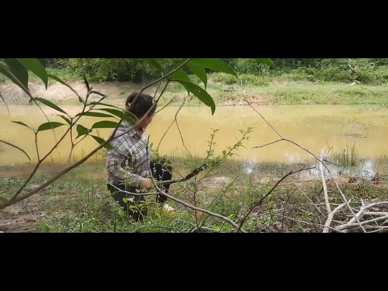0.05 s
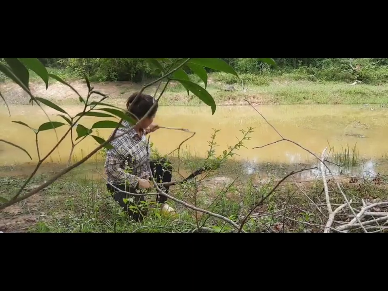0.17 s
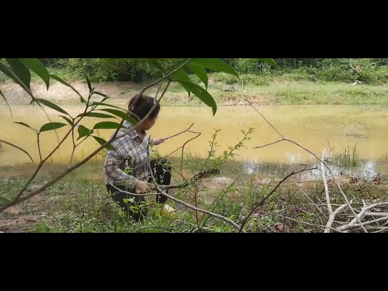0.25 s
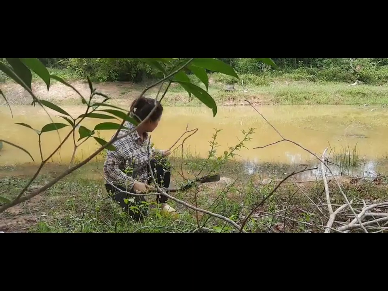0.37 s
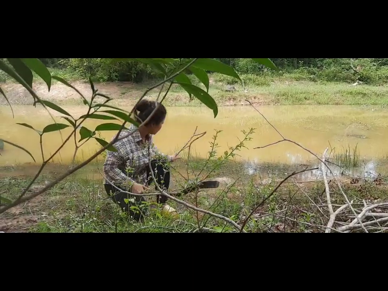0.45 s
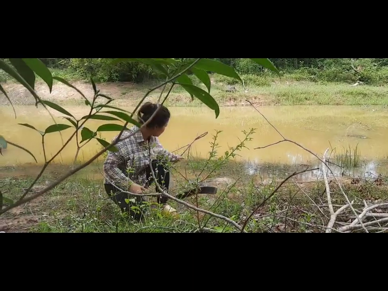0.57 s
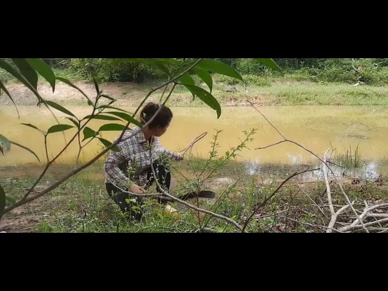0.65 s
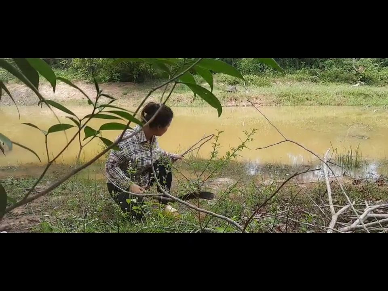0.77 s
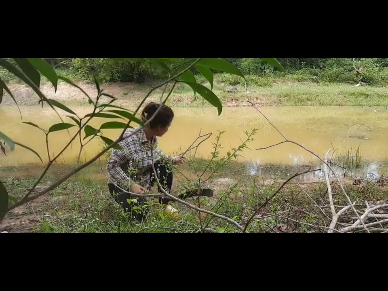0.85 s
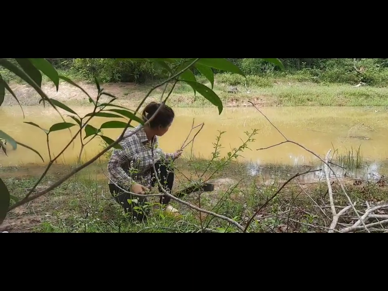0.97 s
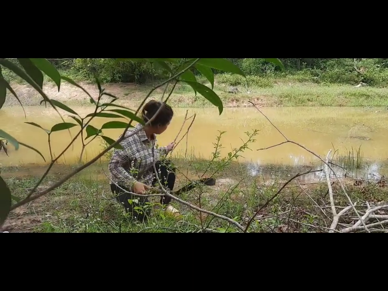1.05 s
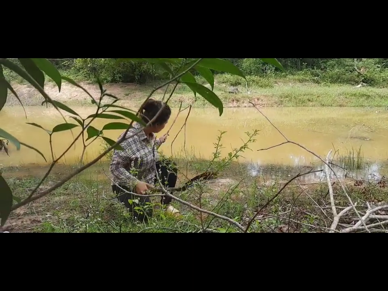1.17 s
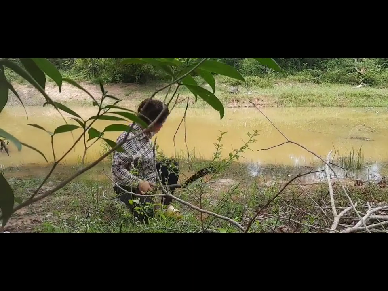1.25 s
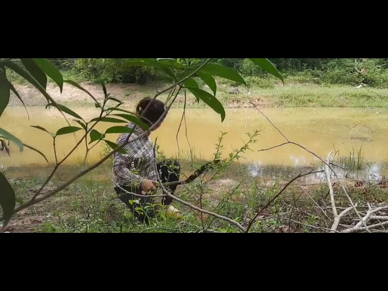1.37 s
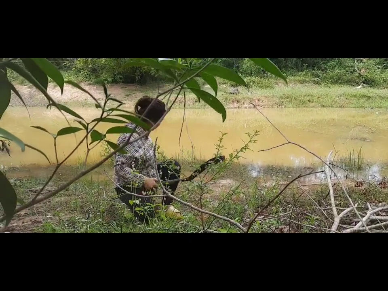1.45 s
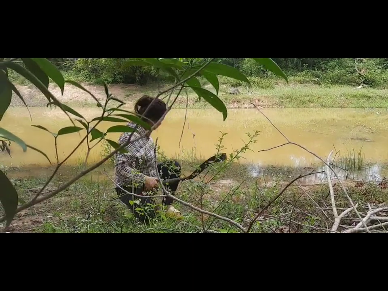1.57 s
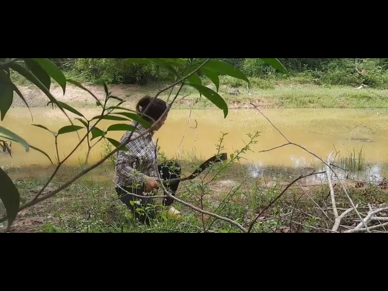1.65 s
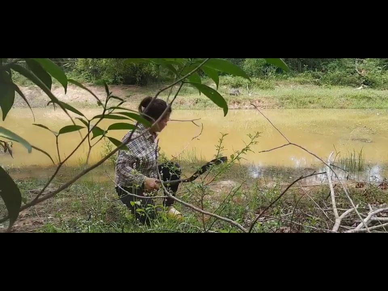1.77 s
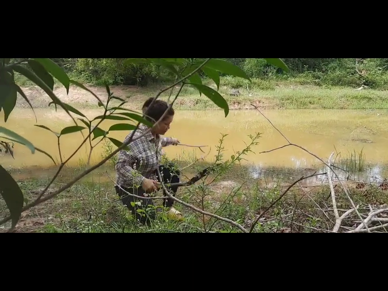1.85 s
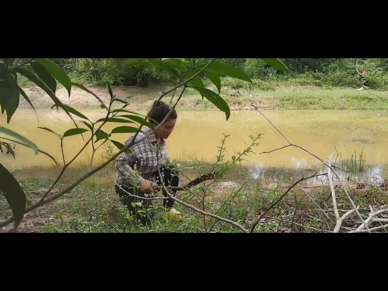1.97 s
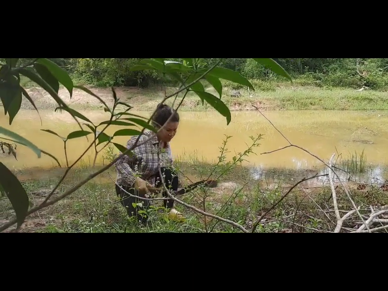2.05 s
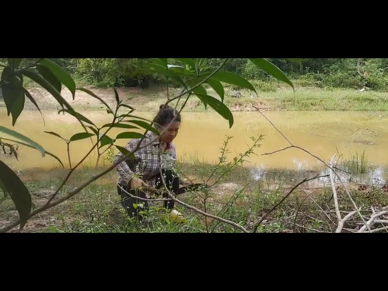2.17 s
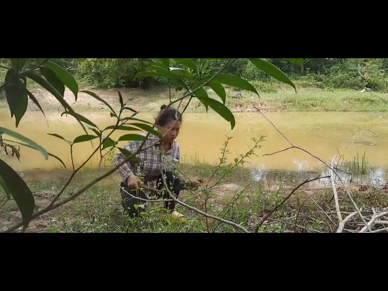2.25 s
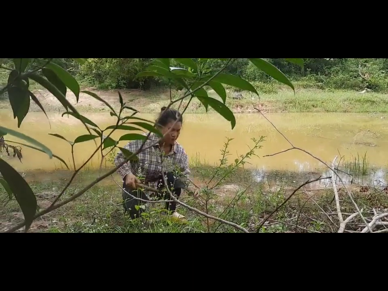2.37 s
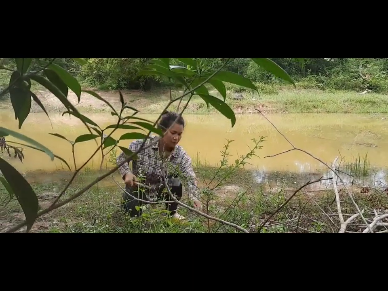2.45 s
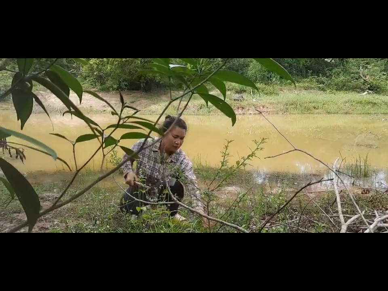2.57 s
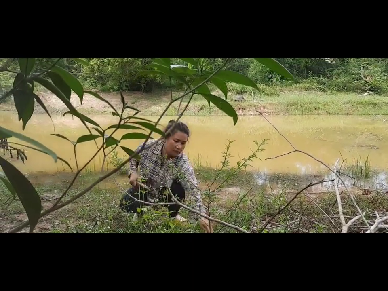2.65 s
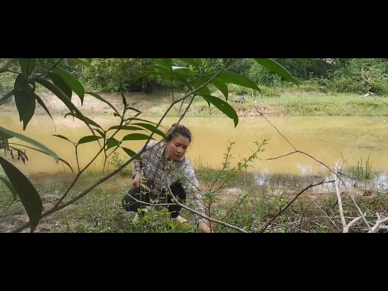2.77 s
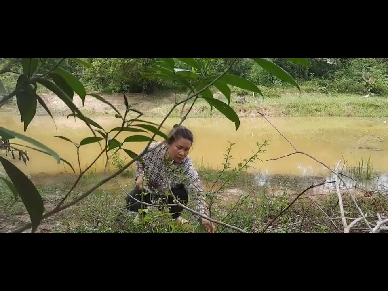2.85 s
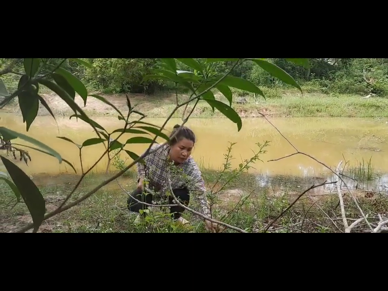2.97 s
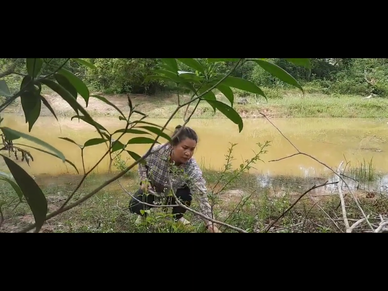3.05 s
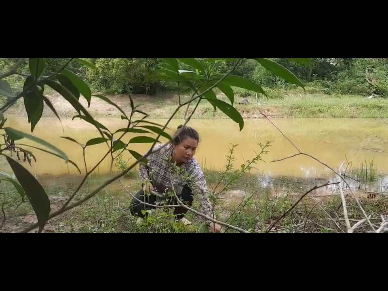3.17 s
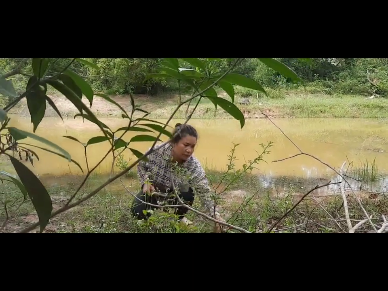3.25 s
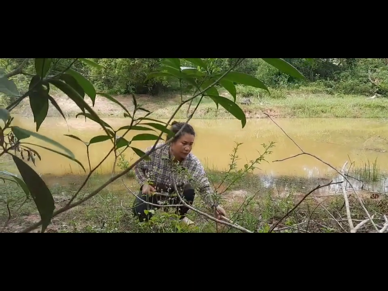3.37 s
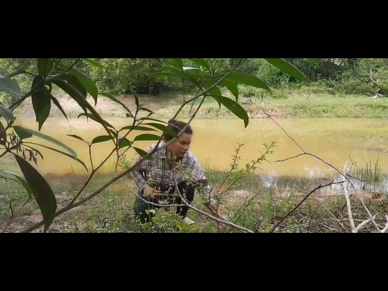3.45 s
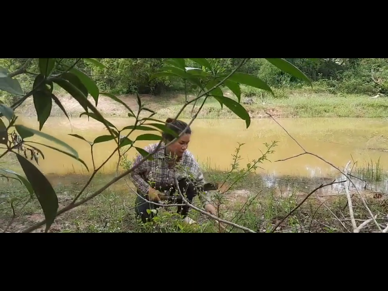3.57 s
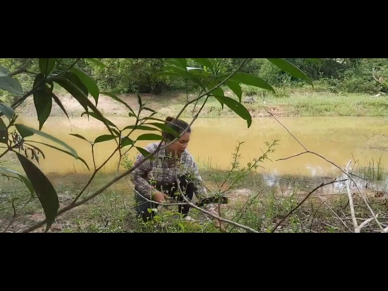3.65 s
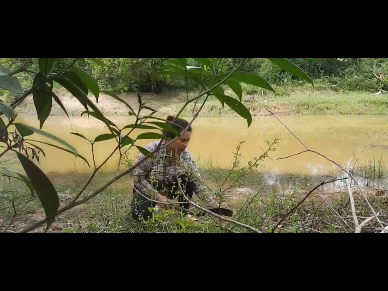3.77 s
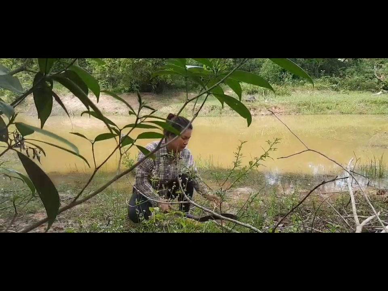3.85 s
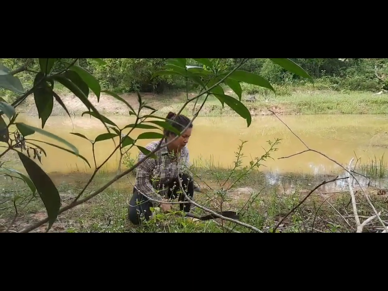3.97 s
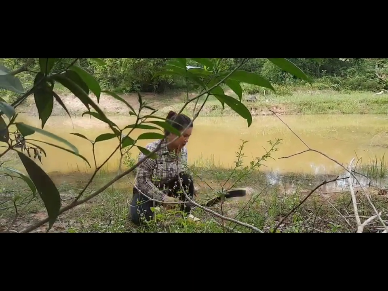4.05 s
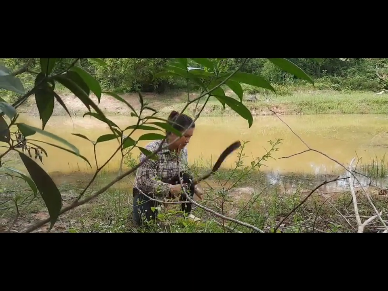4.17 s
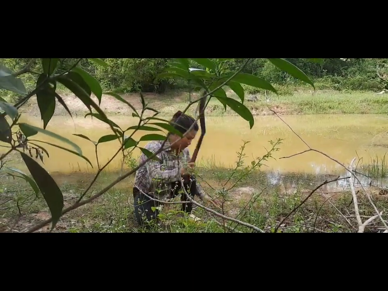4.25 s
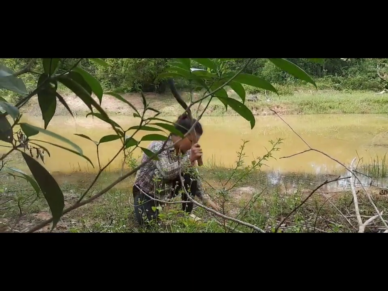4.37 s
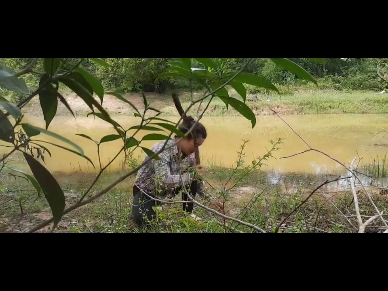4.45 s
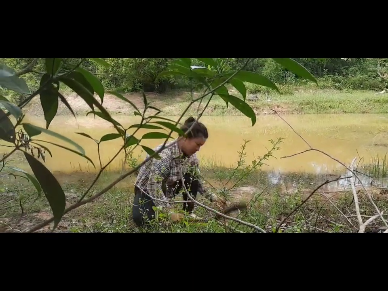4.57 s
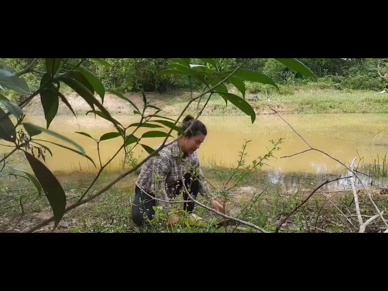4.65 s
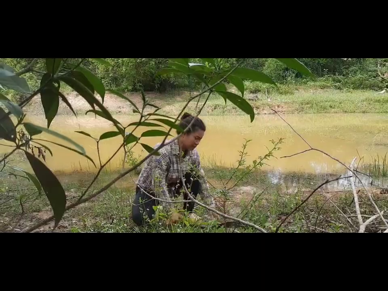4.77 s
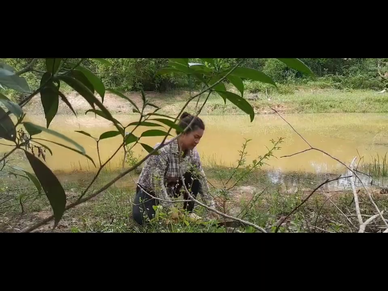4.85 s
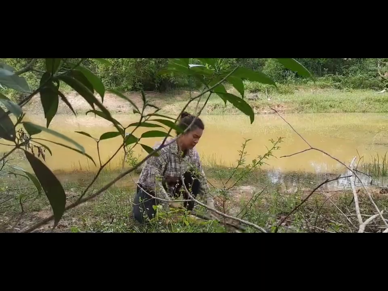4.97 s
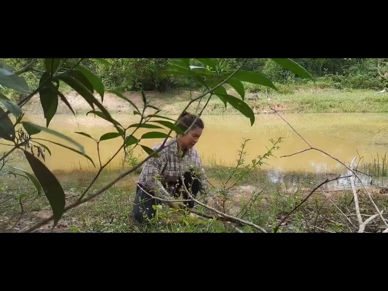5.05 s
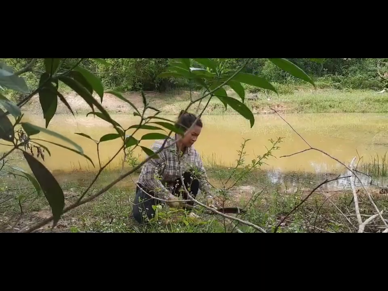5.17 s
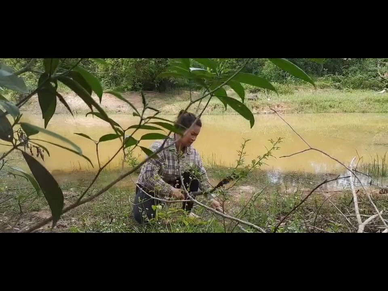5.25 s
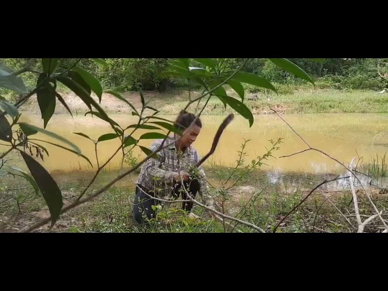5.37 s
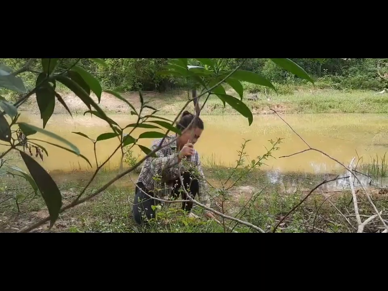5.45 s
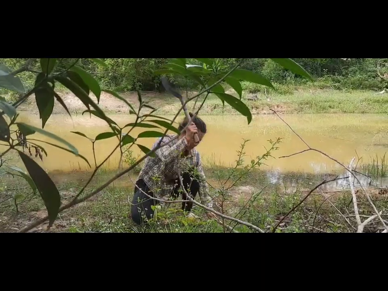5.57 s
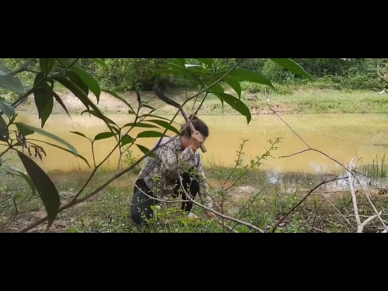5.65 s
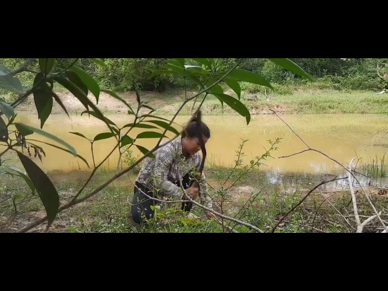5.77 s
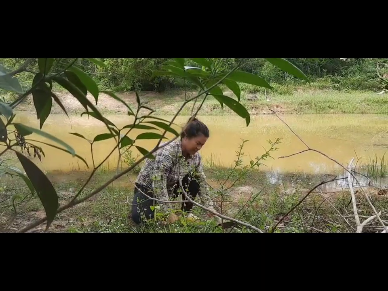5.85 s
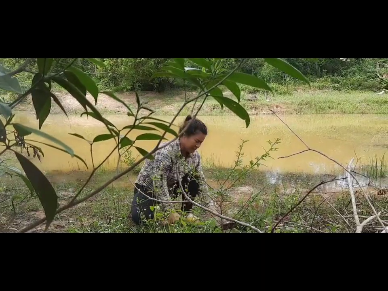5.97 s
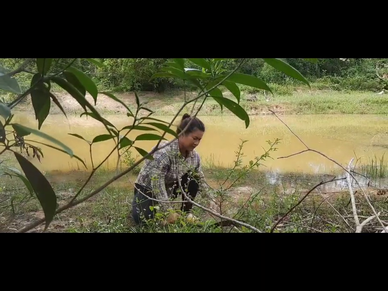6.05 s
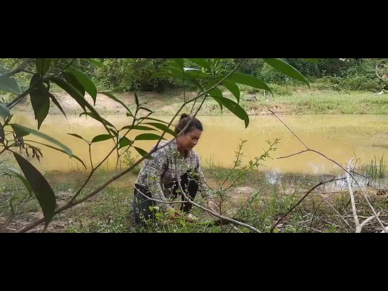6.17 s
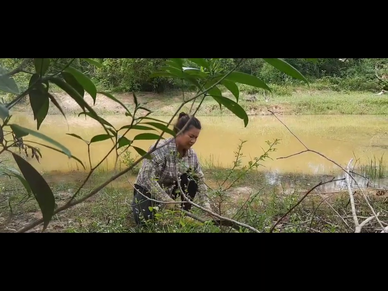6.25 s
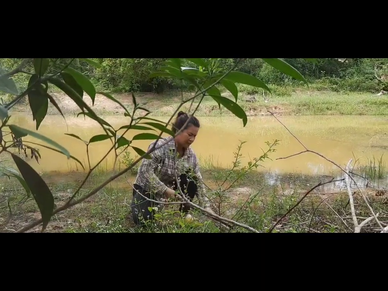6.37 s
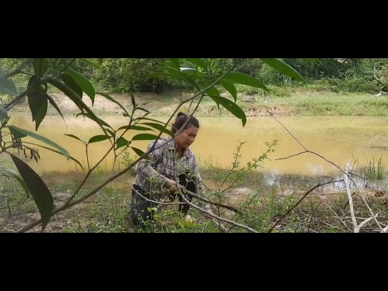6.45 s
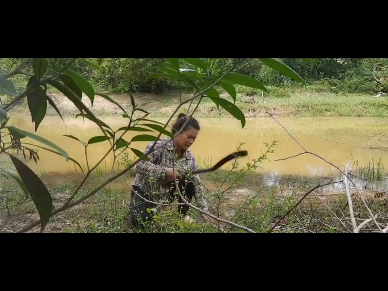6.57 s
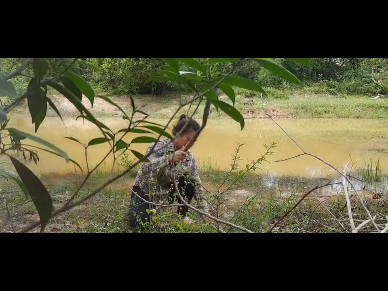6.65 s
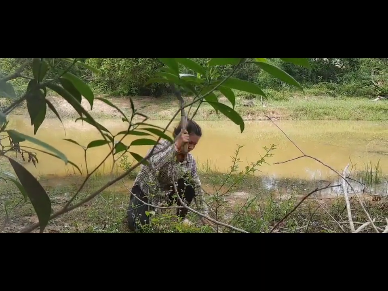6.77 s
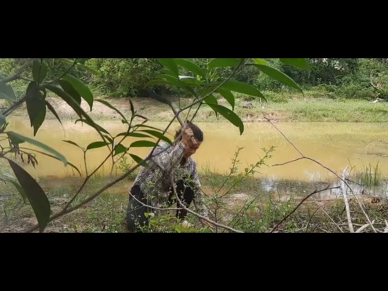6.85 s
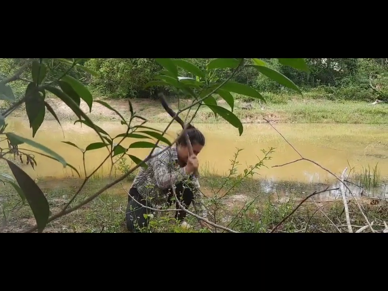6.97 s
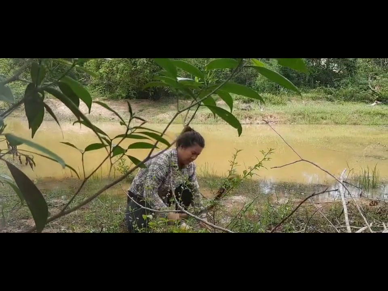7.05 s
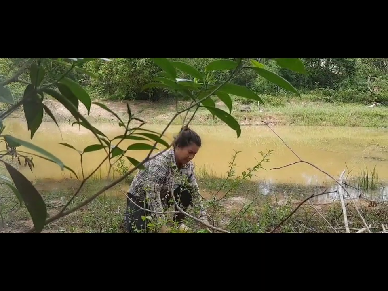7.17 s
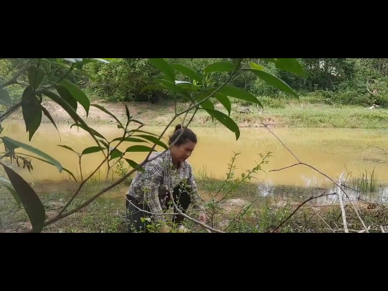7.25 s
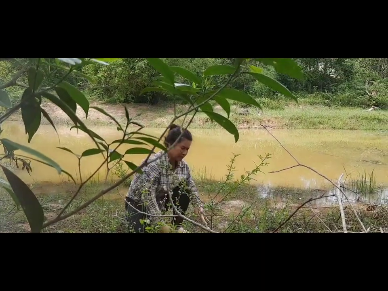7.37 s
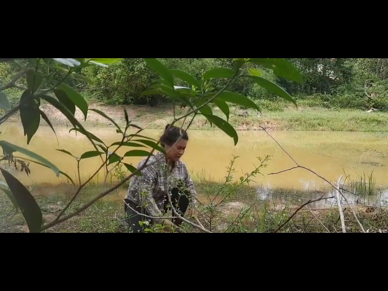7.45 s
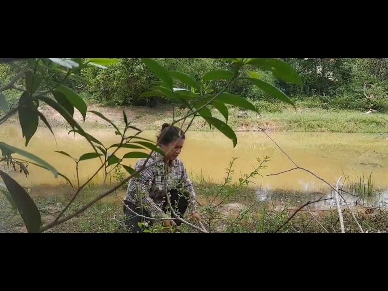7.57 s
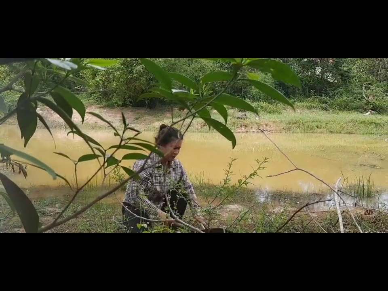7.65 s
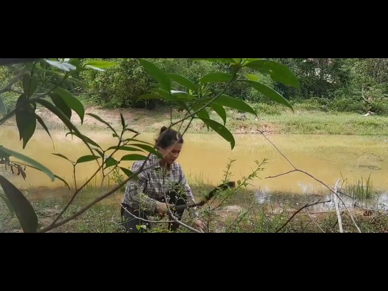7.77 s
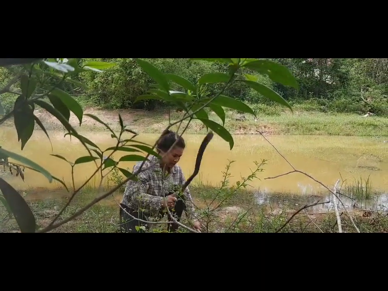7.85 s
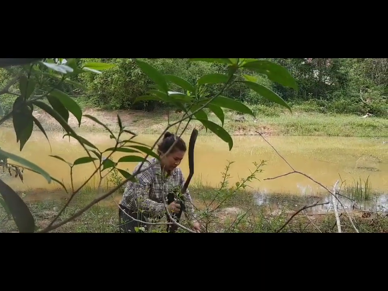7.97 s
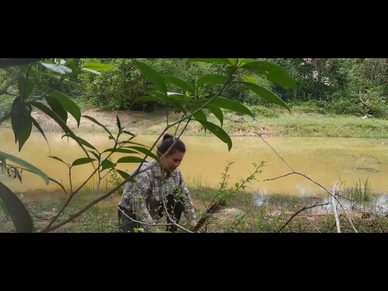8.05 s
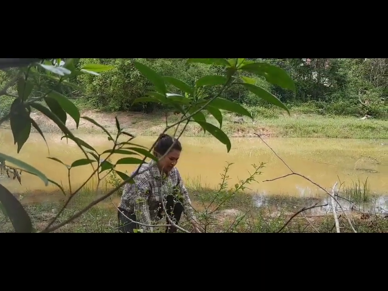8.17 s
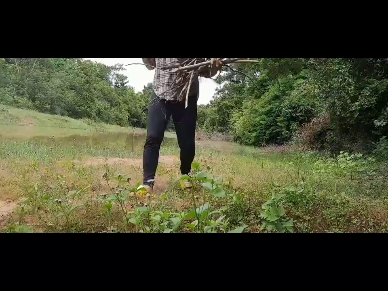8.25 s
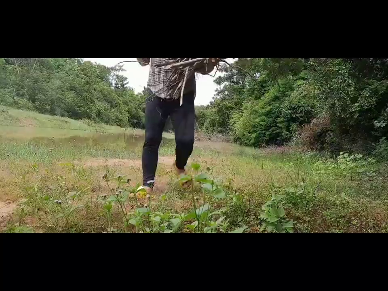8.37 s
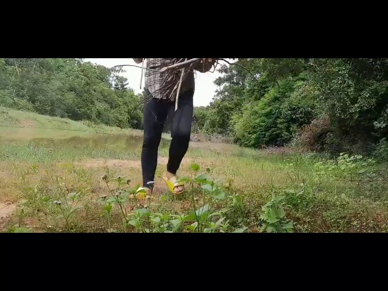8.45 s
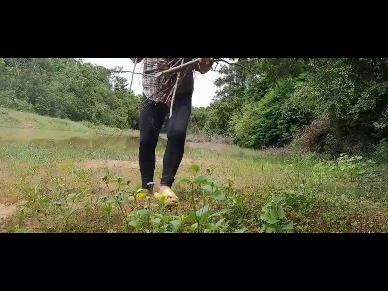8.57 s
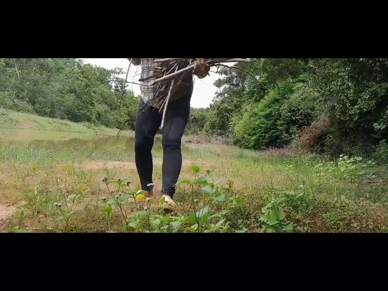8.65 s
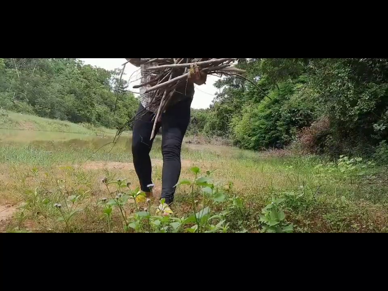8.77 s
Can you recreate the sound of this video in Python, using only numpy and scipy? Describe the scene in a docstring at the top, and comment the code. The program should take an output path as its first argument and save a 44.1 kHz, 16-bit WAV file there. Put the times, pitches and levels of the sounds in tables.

```python
"""In brush beside a pond, dry sticks are chopped on the ground with a long knife.
Each blow is a burst of tiny fractures ringing the stick, plus a push that thumps the soil; noise tails echo it.
Before the first blow a hand gathers twigs from dry leaves, and leaves are pushed aside after each blow, all made
of clumped crackling grains; the blade rings when it touches. Cicadas drone as filtered clicks and pulsed whines,
and far birds glide as sines over noise for the air. After a 29 ms near-silence we are on an open path: steps
swish through grass and other insects buzz."""
import sys
import numpy as np
from scipy import signal
from scipy.fft import rfft, irfft, next_fast_len
from scipy.io import wavfile
from scipy.ndimage import uniform_filter1d

SR = 44100
rng = np.random.default_rng(int(sys.argv[2]) if len(sys.argv) > 2 else 0)


def file_out(sig):
    """Save sig as 16-bit WAV at sys.argv[1]."""
    # one column per channel
    cols = np.atleast_2d(sig).T
    # limit, then scale
    lim = np.clip(cols, -1, 1)
    pcm = np.round(lim * 32767).astype(np.int16)
    wavfile.write(sys.argv[1], SR, pcm)


N = 388068
TIME = np.arange(N) / SR   # seconds
CUTOFF_HZ = 16000   # top of the sound
# Near-silence between pond and path: start and end in seconds.
GAP_S = (8.252, 8.281)

# Knife blows. Each row: start in seconds, splinter level in dB, wood knock level in dB, pitch ratio of the stick,
# delay until the soil is hit in seconds, thump gain in dB, contact time in seconds.
CHOPS = [(4.6034, -13, -21, 1.095, .0038, -12.5, 0.003), (5.856, -13, -19, 0.98, .0047, -9.5, 0.00093),
         (7.1217, -15, -14.5, 1.023, 0.0027, -10, 0.0013), (8.129, -19, -26, 1.19, 0.0024, -20.5, 0.0039)]
SPLIT_S = 0.0022   # rise time of the fracture as a stick gives way
# Colour of tearing fibres. Each row: frequency in Hz, relative level in dB per Hz.
FIBRE_COLOUR = [(300, -7.5), (1500, -2), (3300, -9.5), (4400, -6), (6000, -0.5), (7100, -4.5),
                (8700, -11.5), (10800, -6.5), (13000, -9), (16000, -13)]
# Modes of a dry stick before its own pitch shift. Each row: frequency in Hz, level in dB, t60 in seconds.
STICK_MODES = [(725, -5, 0.011), (827, 1, 0.024), (1485, 1.5, 0.018), (1700, 4, 0.017), (2340, -0.5, 0.012)]
# Modes of the struck soil. Each row: frequency in Hz, level in dB, t60 in seconds.
SOIL_MODES = [(62, -22.5, 0.75), (148.5, -2, 0.074), (172, -10.5, 0.064), (292, -4, 0.051),
              (396, 5.5, 0.024), (803, 1, 0.012)]
# Brush around each blow in turn. Each row: flying debris level in dB, time spent pushing leaves aside in seconds,
# leaf crackle level in dB.
BRUSH = [(-34.5, 0.41, -57), (-40.5, 0.58, -60), (-37.5, 0.47, -67.5), (-44, 0.11, -76.5)]
BRUSH_SETTLE_S, BRUSH_STEM_DB = 0.14, -14   # leaves come to rest; stem scraping against the leaves
# Colour of chips and shaken brush. Each row: frequency in Hz, relative level in dB per Hz.
DEBRIS_COLOUR = [(150, -9), (320, 8.5), (550, -4.5), (850, 1.5), (1200, -1.5), (2400, 3), (3400, 0.5),
                 (6000, -6.5), (9000, -4.5), (16000, -11)]
# Cut pieces landing in the litter. Each row: start in seconds, clatter level in dB.
LANDINGS = [(4.7035, -29), (4.749, -40), (5.9594, -31.5), (6.0725, -38.5)]

# Blade taps and drags. Each row: start in seconds, ring level in dB, contact time in seconds,
# treble tilt in dB per octave.
BLADE_TOUCHES = [(3.7277, -37.5, 0.00027, 13), (3.744, -45.5, 0.015, -7), (3.796, -51, 0.023, 5),
                 (3.836, -40, 0.0234, 1), (7.4035, -31.5, 0.0011, 11.5)]
# Modes of the blade before the tilt. Each row: frequency in Hz, level in dB, t60 in seconds.
BLADE_MODES = [(725, -19, 0.13), (1463, -0.5, 0.057), (1755, -1, 0.055), (3150, -8, 0.03), (2513, 0, 0.019),
               (3850, -2, 0.067), (4030, -0.5, 0.022), (7200, -14.5, 0.049)]

# Twigs that snap or knock together. Each row: start in seconds, crack setting in dB, knock relative to it in dB.
TWIGS = [(0.187, -40, -12), (0.2277, -36, -13.5), (0.757, -47.5, -4.5), (2.0129, -29.5, -11.5),
         (2.0782, -27, -33), (2.1276, -47.5, -1), (3.1034, -29, -23.5), (3.1752, -35.5, -16),
         (3.275, -33, -32), (3.238, -40, -33), (3.411, -30, -16), (3.5771, -31, -34), (3.727, -27.5, -12),
         (3.597, -37, -16), (3.867, -36, -13), (4.1177, -46, -13), (4.1851, -45, -11), (4.74, -30.5, -3.5),
         (4.802, -30, -12), (4.8704, -40, -25), (5.467, -47, -27.5), (6.024, -30.5, -12),
         (7.261, -31.5, -38), (7.4015, -17.5, -29), (8.307, -39, -6)]
# Colour of a twig's crack. Each row: frequency in Hz, relative level in dB per Hz.
TWIG_COLOUR = [(500, -26), (2500, -17), (4200, -2), (6500, 3.5), (9000, -5), (12000, -0.5), (16000, -6)]
TWIG_SIDE_DB = 2   # left minus right

# Short strokes of hand or foot through dry leaves. Each row: start in seconds, length in seconds,
# leaf crackle level in dB, stem scraping against the leaves in dB.
HANDLING = [(0.143, 0.072, -49.5, -6.5), (0.368, 0.095, -64, -12.5), (0.694, 0.072, -70.5, 2.5),
            (0.95, 0.037, -70, -8.5), (1.698, 0.057, -89.5, 15), (1.996, 0.027, -54, -8),
            (2.059, 0.1, -73.5, 4.5), (2.221, 0.042, -63.5, -12), (2.185, 0.54, -76.5, -6.5),
            (2.707, 0.14, -59.5, -17.5), (3.546, 0.035, -48.5, -2.5), (3.815, 0.033, -57.5, 3.5),
            (4.08, 0.059, -64.5, -5.5), (4.413, 0.03, -62.5, -18), (5.106, 0.29, -57.5, -15),
            (5.42, 0.086, -60.5, -15.5), (7.407, 0.12, -73, 5.5), (8.494, 0.2, -62, 4.5),
            (8.692, .11, -64, 10)]
STROKE_ATTACK_SHARE, STROKE_RELEASE_S = 0.5, 0.035   # share of a stroke spent building up; its dying away
# A handful of twigs dragged out of the litter. Each row: time in seconds, leaf crackle level in dB.
GATHERING = [(2.96, -78.5), (3.05, -52), (3.14, -62.5), (3.27, -51.5), (3.39, -51), (3.43, -43), (3.6, -55),
             (3.79, -54.5), (3.95, -73)]
GATHERING_STEM_DB = -8.5   # stem scraping against the leaves
# Faint stir of the litter under the crouching worker: leaf level in dB, stem level in dB.
STIR_DB = (-81.5, -85)
# Colour of leaf crackle. Each row: frequency in Hz, relative level in dB per Hz.
LEAF_COLOUR = [(1500, -22), (3200, -9), (4500, 1.5), (6800, 1.5), (9000, -3.5), (11500, 3), (14000, 2.5),
               (16000, -7.5)]
# Colour of scraping stems. Each row: frequency in Hz, relative level in dB per Hz.
STEM_COLOUR = [(200, -15), (400, -6.5), (750, -6), (1050, -7), (1550, 3.5), (2300, -2), (3200, -5.5),
               (4100, -1.5), (6500, -13)]
# Foot or knife coming down on the soil. Each row: start in seconds, thud gain in dB, contact time in seconds,
# crunch of stems in dB.
BUMPS = [(3.743, -27.5, 0.013, -62), (3.951, -37, 0.0088, -81), (4.438, -28.5, 0.019, -71.5),
         (8.329, -42, 0.0017, -47), (8.795, -38.5, 0.0012, -37)]

# Left minus right colour of the work. Each row: frequency in Hz, difference in dB.
SIDE_BALANCE = [(120, 1), (350, -3.5), (700, 7.5), (1300, 7), (2500, 2.5), (5000, -0.5), (9000, 3.5),
                (15000, 8.5)]
# Strength of the scatter from bank and trees. Each row: frequency in Hz, level in dB.
SCATTER_DB = [(60, -9), (140, -16.5), (350, -16), (900, -27), (2500, -9.5), (6000, -13.5), (14000, -17)]
# Decay of that scatter. Each row: frequency in Hz, t60 in seconds.
SCATTER_T60 = [(60, 0.56), (300, 0.16), (1500, 0.38), (5000, 0.28), (14000, 1)]

CICADA_DB, PATH_CICADA_DB, PATH_CICADA_PITCH = -57.5, -57, 0.98   # pond level; path level and pitch ratio
# Colour of the cicada song at the pond. Each row: frequency in Hz, relative level in dB per Hz.
SONG_COLOUR = [(3500, -60), (4650, -41.5), (4920, -22.5), (5060, -2), (5200, 0.5), (5340, -2.5),
               (5460, -10), (5560, -18), (5750, -25.5), (7000, -45.5), (9800, -45), (10500, -31),
               (11300, -36), (12500, -54)]
# Nearest cicadas. Each row: centre pitch in Hz, tymbal pulses per second, centre level in dB.
SINGERS = [(5116, 62, -62.5), (5330, 123, -62.5)]
BUZZ_DB = -69.5
# Colour of the insects along the path. Each row: frequency in Hz, relative level in dB per Hz.
BUZZ_COLOUR = [(1000, -12), (3100, -19), (3650, -6), (4150, -9), (4500, -24), (9000, -20)]
# Far birds. Each row: start in seconds, length in seconds, start pitch in Hz, end pitch in Hz, peak level in dB.
BIRDS = [(1.766, .17, 7160, 7250, -68), (1.848, 0.17, 7800, 7900, -72), (6.396, 0.23, 6940, 7200, -66),
         (6.672, 0.065, 2070, 2200, -77.5), (7.694, 0.48, 2105, 2432, -78)]

# Swells of a dull far rush. Each row: middle in seconds, peak level in dB.
SWELLS = [(1.23, -72.5), (4.021, -66), (6.3, -69)]
# Colour of the far rush. Each row: frequency in Hz, relative level in dB per Hz.
SWELL_COLOUR = [(180, -36.5), (330, -3), (400, -7), (520, -20), (900, -35)]
# Colour of the open air. Each row: frequency in Hz, relative level in dB per Hz.
AIR_COLOUR = [(250, -19), (400, -6), (930, -7), (1600, -12.5), (2200, -13), (3200, -26), (4400, -20),
              (6000, -49.5)]
# Colour of its treble. Each row: frequency in Hz, relative level in dB per Hz.
TREBLE_COLOUR = [(3000, -7.5), (4200, -3), (7000, -5), (11000, -7.5), (16000, -2.5)]
# Colour of the low rumble. Each row: frequency in Hz, relative level in dB per Hz.
RUMBLE_COLOUR = [(12, -61.5), (20, -22), (65, 0), (86, 4), (132, -1), (178, -15), (216, -19.5),
                 (287, -16.5), (343, -15), (512, -33.5), (700, -37), (910, -54), (1540, -120)]
# Gain of the rumble at the pond. Each row: time in seconds, gain in dB.
POND_RUMBLE_DB = [(0, -66), (.8, -61.5), (3.7, -60.5), (4.3, -63.5), (8.2, -64)]
PATH_RUMBLE_DB, PATH_EASING_DB_PER_S = -47.5, 11   # on the path it starts louder and eases off


def from_db(db):
    """Decibels to gain."""
    return 10 ** (np.asarray(db) / 20)


def rms_one(x):
    """Scale to unit power."""
    return x / np.sqrt(np.mean(x ** 2) + 1e-20)


def as_loud_as(x, db, length_s):
    """Give a burst, on each side, the energy of that level held for that long."""
    energy = np.sum(x ** 2, axis=-1, keepdims=True) + 1e-20
    return from_db(db) * x * np.sqrt(length_s * SR / energy)


def at_hz(points, hz):
    """Read a table on a log-frequency axis."""
    table_hz, values = np.array(points).T
    return np.interp(np.log(hz), np.log(table_hz), values)


def pan(db):
    """Left and right gains for a left-minus-right difference."""
    return from_db([[db / 2], [-db / 2]])


def add(out, s, sound):
    """Mix a sound in at time s."""
    i = max(0, round(s * SR))
    out[:, i:i + sound.shape[-1]] += sound[..., :N - i]


def drift(rate_hz):
    """Slow random wander with spread 1; a higher rate wanders faster."""
    step, warm_up = 40, 2000   # samples per slow point; slow points thrown away
    r = np.exp(-2 * np.pi * step * rate_hz / SR)
    noise = rng.standard_normal(N // step + warm_up + 2)
    slow = signal.lfilter([1], [1, -2 * r, r * r], noise)[warm_up:]
    return np.interp(np.arange(N) / step, np.arange(len(slow)), rms_one(slow))


def coloured(x, spectrum, size=8192):
    """Causal (minimum-phase) filter with the given spectrum and unit power gain."""
    hz = np.maximum(np.arange(size // 2 + 1) * SR / size, 1)
    cepstrum = irfft(at_hz(spectrum, hz) * np.log(10) / 20)
    response = irfft(np.exp(rfft(2 * cepstrum[:size // 2], size)))   # folding makes it causal
    response = response / np.linalg.norm(response)
    return signal.oaconvolve(x, response[None], axes=1)[:, :x.shape[1]]


def ring(force, modes):
    """A force sets each mode ringing as a dying sine."""
    out = 0
    for hz, db, t60 in modes:
        r, w = from_db(-60 / (t60 * SR)), 2 * np.pi * hz / SR
        mode = signal.lfilter([0, np.sin(w)], [1, -2 * r * np.cos(w), r * r], force + 1e-18)
        out = out + from_db(db) * mode
    return out


def cracks(per_s, spread_db, shared, size):
    """Stereo train of tiny fractures of uneven size; a share of their power reaches both sides alike."""
    excess = np.minimum(rng.exponential(1, (3, size)), 4)
    sizes = from_db(spread_db * excess) * rng.choice([-1, 1], (3, size))
    clicks = sizes * (rng.random((3, size)) < per_s / SR)
    shared = np.clip(shared, 0, 1)
    return rms_one(np.sqrt(shared) * clicks[2] + np.sqrt(1 - shared) * clicks[:2])


def fracture(rise_s, after_db, after_s, shared, spread_db=8, size=4096):
    """Fibres give way in an avalanche, with a dying trail of stragglers."""
    t = np.arange(size) / SR
    avalanche = (t / rise_s) ** 2 * np.exp(2 - 2 * t / rise_s)
    stragglers = from_db(after_db) * np.exp(-t / after_s) * (t > rise_s)
    return cracks(16000, spread_db, shared, size) * (avalanche + stragglers)


def grains(per_s, spread_db, shared, count=12):
    """Crackle in which each tiny fracture briefly rings at one of a dozen pitches."""
    clicks, dealt = cracks(per_s, spread_db, shared, N), rng.integers(0, count, N)
    out = 0
    for k, hz in enumerate(np.geomspace(350, CUTOFF_HZ, count)):
        b, a = signal.iirpeak(hz, 2, fs=SR)
        out = out + signal.lfilter(b, a, clicks * (dealt == k) + 1e-18)
    return rms_one(out)


def clumps(per_s, fade_s, bed):
    """Leaves catch and spring free: sudden bursts of crackle that fade, over a steadier bed."""
    releases = (rng.random(N) < per_s / SR) * rng.uniform(0.12, 1, N) ** 2
    bursts = signal.lfilter([1], [1, -np.exp(-1 / (fade_s * SR))], releases + 1e-18)
    return rms_one(np.sqrt(abs(bed) + bursts))


def stroke(start_s, length_s, release_s):
    """Pressure builds, holds and is let go."""
    age = TIME - start_s
    rise = np.clip(age / (STROKE_ATTACK_SHARE * length_s), 0, 1) ** 2
    return rise * np.exp(-np.clip((age - length_s) / release_s, 0, 20))


def chops():
    """The blade splinters the stick, the stick rings, and the blow lands on the soil."""
    out = np.zeros((2, N))
    for s, splinter_db, knock_db, pitch, delay_s, thump_db, contact_s in CHOPS:
        tearing = fracture(SPLIT_S, after_db=-6.5, after_s=0.012, shared=0.4)
        add(out, s, as_loud_as(coloured(tearing, FIBRE_COLOUR), splinter_db, 0.0071))
        jolt = fracture(SPLIT_S, after_db=-12.0, after_s=0.0071, shared=0.85)
        add(out, s, as_loud_as(stick(jolt, detune=0.0047, pitch=pitch), knock_db, 0.0061))
        add(out, s + delay_s, from_db(thump_db) * thud(contact_s))
    # a small patch of ground radiates little deep bass
    return signal.sosfilt(signal.butter(2, 110, "high", fs=SR, output="sos"), out + 1e-18)


def stick(force, detune, pitch=1):
    """Every stick has its own length, so its modes shift together."""
    shift = pitch * np.exp(detune * rng.standard_normal())
    return ring(force, [(hz * shift, db, t60) for hz, db, t60 in STICK_MODES])


def thud(contact_s, size=16384):
    """A push sets the soil's modes ringing; a longer push is duller."""
    push = np.sin(np.pi * np.minimum(np.arange(size) / SR / contact_s, 1)) ** 2
    return ring(push / push.sum(), SOIL_MODES)


def debris(t60=0.6):
    """Every blow throws chips and shakes the brush; the patter dies away in clumps."""
    shaking = np.zeros(N)
    for (s, *_), (debris_db, *_) in zip(CHOPS, BRUSH):
        age = np.maximum(TIME - s, 0)
        shaking += from_db(debris_db - 60 * age / t60) * (1 - np.exp(-age / 0.013))
    patter = coloured(grains(3500, 2.4, 0.3), DEBRIS_COLOUR)
    return shaking * clumps(per_s=43, fade_s=0.01, bed=0.23) * patter


def landings():
    """The litter damps a falling piece at once, leaving a dry clatter."""
    out = np.zeros((2, N))
    for s, db in LANDINGS:
        burst = fracture(0.0015, after_db=-7, after_s=0.0097, shared=0.4)
        low_pass = signal.butter(2, 2200, fs=SR, output="sos")
        dull = signal.sosfilt(low_pass, coloured(burst, STEM_COLOUR))
        add(out, s, as_loud_as(dull, db, 0.0017))
    return out


def blade(size=8192):
    """Each touch feeds tiny impacts into the steel, with its own tilt towards high or low modes."""
    out, t = np.zeros((2, N)), np.arange(size) / SR
    lowest_hz = BLADE_MODES[0][0]
    for s, db, contact_s, tilt_db in BLADE_TOUCHES:
        grit = cracks(9000, 4.8, 0.9, size) * t / contact_s * np.exp(-(t / contact_s) ** 2)
        modes = [(hz, level + tilt_db * np.log2(hz / lowest_hz), t60) for hz, level, t60 in BLADE_MODES]
        add(out, s, as_loud_as(ring(grit, modes), db, 0.0042))
    return out


def twigs(thick_break_s=0.0026, by_knock=0.13):
    """Snaps and knocks: a sharp crack and a wooden ring; woodier twigs take longer to give."""
    out = np.zeros((2, N))
    for s, db, knock_db in TWIGS:
        break_s = thick_break_s * from_db(by_knock * knock_db)
        burst = fracture(break_s, after_db=-6.5, after_s=7 * break_s, shared=0.17, spread_db=2.0)
        crack = as_loud_as(coloured(burst, TWIG_COLOUR), db - 3.5, 0.0015)
        knock = as_loud_as(stick(burst, detune=0.122), db + knock_db, 0.00092)
        add(out, s, (crack + knock) * pan(TWIG_SIDE_DB))
    return out


def rustle():
    """Strokes, clearing after each blow and one long pull: leaves crackle in clumps over scraping stems."""
    pull = from_db(np.interp(TIME, *np.transpose(GATHERING), left=-np.inf, right=-np.inf))
    moves = [(pull, GATHERING_STEM_DB)]
    for s, length_s, db, stem_db in HANDLING:
        moves.append((from_db(db) * stroke(s, length_s, STROKE_RELEASE_S), stem_db))
    for (s, *_), (_, length_s, db) in zip(CHOPS, BRUSH):
        moves.append((from_db(db) * stroke(s, length_s, BRUSH_SETTLE_S), BRUSH_STEM_DB))
    power = from_db(STIR_DB)[:, None] ** 2   # one row for leaves, one for stems
    for effort, stem_db in moves:
        power = power + (effort * from_db([[0], [stem_db]])) ** 2
    leaf, stem = np.sqrt(power) * clumps(per_s=120, fade_s=0.008, bed=0.1)
    leaves = coloured(grains(8900, 2.2, 0.034), LEAF_COLOUR)
    stems = coloured(grains(1800, 2.4, 0.094), STEM_COLOUR)
    return leaf * leaves + stem * stems


def bumps(crunch_s=0.00082):
    """A soft weight meets the ground and crushes a few stems."""
    out = np.zeros((2, N))
    for s, thud_db, contact_s, crunch_db in BUMPS:
        crushing = fracture(crunch_s, after_db=-9.5, after_s=0.015, shared=0.39)
        add(out, s, as_loud_as(stick(crushing, detune=0.079), crunch_db, 0.0052))
        add(out, s, from_db(thud_db) * thud(contact_s))
    return out


def side_colour(x):
    """Colour left and right in opposite directions, half the balance each, without delay."""
    size = next_fast_len(N + 4096)
    side_db = at_hz(SIDE_BALANCE, np.maximum(np.arange(size // 2 + 1) * SR / size, 1))
    return irfft(rfft(x, size) * from_db([side_db / 2, -side_db / 2]), size)[:, :N]


def scatter(x, size=40000):
    """Bank and foliage return a diffuse tail that dies at its own rate in each octave."""
    t, edges, response = np.arange(size) / SR, np.geomspace(35, 18000, 10), 0
    for low, high in zip(edges, edges[1:]):
        hz = np.sqrt(low * high)
        alike = 1 / (1 + (hz / 600) ** 2)   # long waves reach both sides alike
        common, separate = rng.standard_normal(size), rng.standard_normal((2, size))
        white = np.sqrt(alike) * common + np.sqrt(1 - alike) * separate
        band = signal.sosfilt(signal.butter(2, [low, high], "band", fs=SR, output="sos"), white)
        tail = band * from_db(-60 * t / at_hz(SCATTER_T60, hz)) * (1 - np.exp(-t / 0.0015))
        response = response + as_loud_as(tail, at_hz(SCATTER_DB, hz), 2 * (high - low) / SR ** 2)
    return signal.oaconvolve(x, response, axes=1)[:, :N]


def cicadas(waver_db=-0.66):
    """Many tymbals click into the same narrow resonance and blur into one band."""
    clicks = cracks(6000, 1.0, 0.052, N)
    path_song = [(hz * PATH_CICADA_PITCH, db) for hz, db in SONG_COLOUR]
    pond = from_db(CICADA_DB) * coloured(clicks, SONG_COLOUR)
    path = from_db(PATH_CICADA_DB) * coloured(clicks, path_song)
    return np.where(TIME < GAP_S[1], pond, path) * from_db(waver_db * drift(34)) * pan(0.99)


def singers(swell_db=3.0, wander=0.007):
    """The nearest cicadas at the pond stand out of the chorus as pulsed, wandering whines."""
    out = 0
    for hz, pulses_per_s, db in SINGERS:
        pulses = 1 + 0.56 * np.cos(2 * np.pi * pulses_per_s * TIME + 2 * drift(7))
        phase = 2 * np.pi * np.cumsum(hz * (1 + wander * drift(20))) / SR
        side_phase = np.array([drift(10), drift(20)])   # radians, left and right
        out = out + from_db(db + swell_db * drift(1)) * pulses * np.sin(phase + side_phase)
    return out * (TIME < GAP_S[0])


def path_insects():
    """A lower, fainter chorus of filtered clicks, heard only on the path."""
    buzz = coloured(cracks(4000, 1.0, 0.059, N), BUZZ_COLOUR)
    return from_db(BUZZ_DB) * buzz * (TIME > GAP_S[1])


def birds():
    """Thin gliding whistles, their pitch wavering quickly as distance blurs them."""
    out, waver = np.zeros((2, N)), drift(150)
    for s, length_s, start_hz, end_hz, db in BIRDS:
        along = np.clip((TIME - s) / length_s, 0, 1)
        hz = (start_hz + (end_hz - start_hz) * along) * (1 + 0.011 * waver)
        out += from_db(db) * np.sin(np.pi * along) * np.sin(2 * np.pi * np.cumsum(hz) / SR)
    return out


def far_rush(half_s=0.14):
    """Soft dull swells of noise from far away."""
    swell = sum(from_db(db) * np.exp(-((TIME - s) / half_s) ** 2) for s, db in SWELLS)
    return swell * coloured(rng.standard_normal((1, N)), SWELL_COLOUR)


def open_air():
    """Low rumble noise, partly shared by both sides, under a faint wide hiss."""
    on_path_s = TIME - GAP_S[1]
    pond_db = np.interp(TIME, *np.transpose(POND_RUMBLE_DB))
    path_db = PATH_RUMBLE_DB - PATH_EASING_DB_PER_S * on_path_s
    level_db = np.where(on_path_s < 0, pond_db, path_db) + 0.84 * drift(4.1)
    low = coloured(rng.standard_normal(N) + 0.81 * rng.standard_normal((2, N)), RUMBLE_COLOUR)
    hiss = from_db(-81.0) * coloured(rng.standard_normal((2, N)), AIR_COLOUR)
    treble = from_db(-76.5) * coloured(rng.standard_normal((2, N)), TREBLE_COLOUR)
    return low * from_db(level_db) + (hiss + treble) * pan(0.9)


def scene():
    """Woodwork and its echo over the pond's steady life; a gap cuts off the last tail and opens on the path."""
    struck = side_colour(chops()) + twigs() + landings() + bumps() + birds()
    steel = side_colour(blade())
    echo = scatter(struck + 1.2 * steel)
    tails = (echo + side_colour(debris())) * (TIME < GAP_S[0])
    work = struck + steel + tails + side_colour(rustle())
    background = cicadas() + singers() + path_insects() + open_air() + far_rush()
    outside_gap = (TIME < GAP_S[0]) | (TIME > GAP_S[1])
    sounding = uniform_filter1d(1.0 * outside_gap, size=128)   # short ramps at the edges
    return (work + background) * np.maximum(sounding, from_db(-49))


def record(dry):
    """The deepest bass is thinned, the highest peaks are rounded and the top is cut."""
    thinned = signal.sosfilt(signal.butter(2, 36, "high", fs=SR, output="sos"), dry)
    rounded = 1.212 * np.tanh(thinned / 1.345)
    return signal.sosfilt(signal.ellip(10, 0.1, 80, CUTOFF_HZ, fs=SR, output="sos"), rounded)


dry = scene()
out = record(dry)
file_out(out)
```